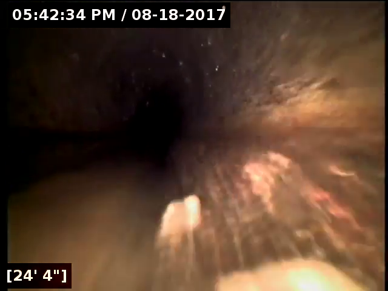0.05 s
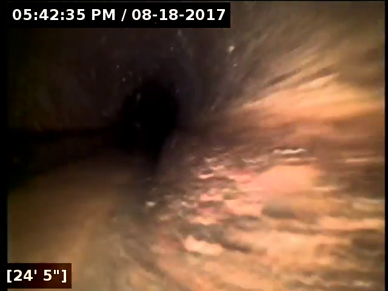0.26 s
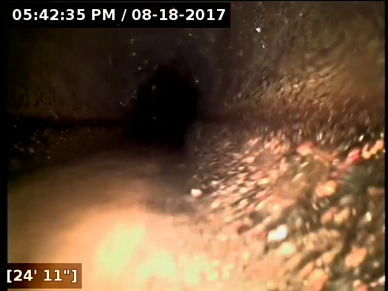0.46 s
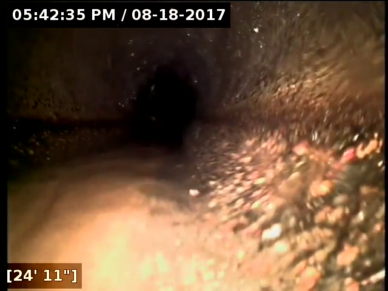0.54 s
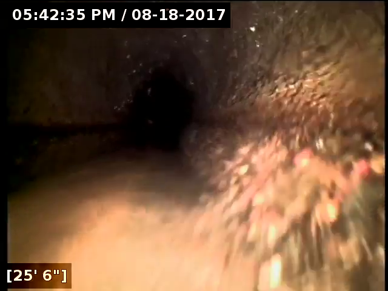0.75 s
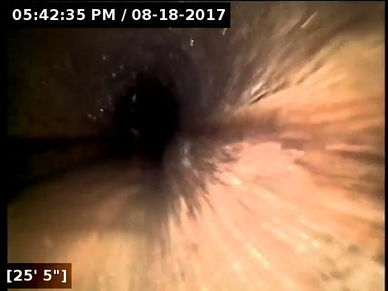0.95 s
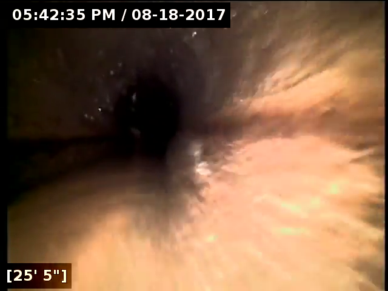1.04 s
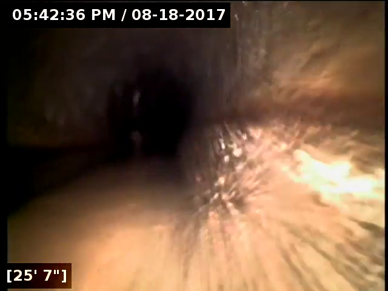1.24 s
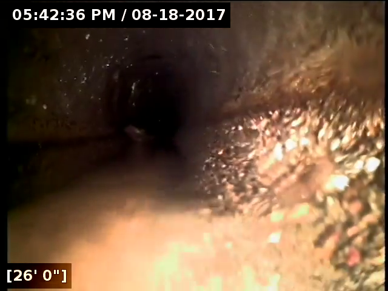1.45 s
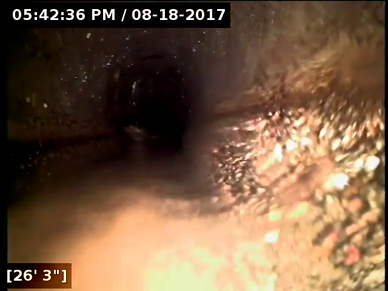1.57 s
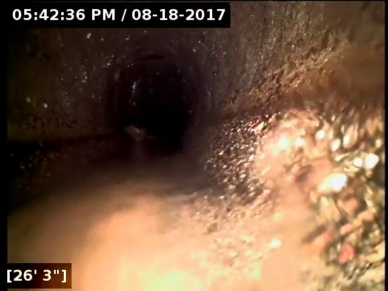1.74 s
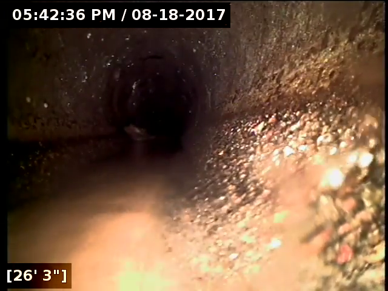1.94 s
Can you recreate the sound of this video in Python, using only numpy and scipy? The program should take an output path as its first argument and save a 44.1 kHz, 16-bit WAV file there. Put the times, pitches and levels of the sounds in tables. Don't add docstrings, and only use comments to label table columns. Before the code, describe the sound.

A stiff cable is pushed by hand into a drain pipe, scraping unevenly, clicking on its reel frame and bumping a hollow drum; a brief dropout, then sparser rattles fade into quiet room air, on a dull small microphone.

```python
import sys
import numpy as np
from scipy import signal
from scipy.io import wavfile
from scipy.ndimage import uniform_filter1d

SR = 44100
rng = np.random.default_rng(int(sys.argv[2]) if len(sys.argv) > 2 else 0)


def boost_factor(decibels):
    exponent = np.asarray(decibels, float) / 20
    return 10 ** exponent


def pcm_store(signal):
    levels = np.round(np.clip(np.atleast_2d(signal), -1, 1) * 32767)
    wavfile.write(sys.argv[1], SR, levels.astype(np.int16).T)


N = 88244

PATCHY_DB = 0.9


def rms_one(x):
    return x / np.sqrt(np.mean(x ** 2) + 1e-20)


def drift(rate_hz):
    pole = np.exp(-80 * np.pi * rate_hz / SR)
    noise = rng.standard_normal(N // 40 + 2002)
    slow = signal.lfilter([1], [1, -2 * pole, pole * pole], noise)[2000:]
    return np.interp(np.arange(N) / 40, np.arange(len(slow)), rms_one(slow))


def ring(x, hz, t60_s):
    pole = boost_factor(-60 / (t60_s * SR))
    w = 2 * np.pi * hz / SR
    return signal.lfilter([0, np.sin(w)], [1, -2 * pole * np.cos(w), pole * pole], x + 1e-18)


def grit(size, contacts_per_s):
    spread_db = 2.2
    when, sign, strength = rng.random((3, size))
    hits = (when < contacts_per_s / SR) * np.sign(sign - 0.5)
    return hits * boost_factor(-spread_db * np.log(strength + 0.0033))


def bandpass(x, low_hz, high_hz):
    return signal.sosfilt(signal.butter(2, [low_hz, high_hz], "band", fs=SR, output="sos"), x)


def coloured(source, spectrum, patchy_db):
    hz, db = np.transpose(spectrum)
    edges_hz = np.geomspace(hz[0], hz[-1], int(3 * np.log2(hz[-1] / hz[0])) + 2)
    out = 0
    together = drift(27)
    for k, (low, high) in enumerate(zip(edges_hz, edges_hz[1:])):
        band = bandpass(source[k % 2], low, high)
        level_db = np.interp(np.log(low * high) / 2, np.log(hz), db)
        out = out + band * boost_factor(level_db + patchy_db * (together / 2 + drift(15)))
    return rms_one(out)


def strike(start_s, peak_db, length_s, rise_s, modes, favoured_hz, spread_db, crack_db):
    contacts_per_s, first_contact, detune = 4000, 7.0, 0.02
    focus_db = 8.0
    highs_sooner = 0.25
    crack_span = 1.674
    t = np.arange(SR // 5) / SR
    decay = t / max(length_s, 5e-4)
    run = (grit(len(t), contacts_per_s) + rng.standard_normal(len(t))) * (1 - np.exp(-t / rise_s))
    run[int(rise_s * SR)] += first_contact

    chance = rng.standard_normal((len(modes), 2))
    sound = 0
    for k, ((hz, level_db, t60_s), (level_dev, pitch_dev)) in enumerate(zip(modes, chance)):
        off_db = focus_db * np.log2(hz / favoured_hz) ** 2
        gain = boost_factor(level_db + spread_db * level_dev - off_db)
        felt = run * np.exp(-decay * (hz / favoured_hz) ** highs_sooner)
        mode = rms_one(ring(felt, hz * (1 + detune * pitch_dev), t60_s))
        sound = sound + gain * (-1) ** k * np.sqrt(t60_s) * mode

    crack = bandpass(run * np.exp(-decay), favoured_hz / crack_span, min(favoured_hz * crack_span, 9000))
    sound = sound + boost_factor(crack_db) * rms_one(crack)

    peak = np.sqrt(2 * uniform_filter1d(sound ** 2, size=200).max())
    out = np.zeros(N + len(t))
    i = int(start_s * SR)
    out[i:i + len(t)] = boost_factor(peak_db) * sound / peak
    return out[:N]


def scrape(drag_db):
    # [f/Hz, density/dB per Hz]
    colour = [(88, -42), (150, -12.5), (247, 2), (431, -17), (588, -7), (1450, -12.5), (2210, -8),
              (3230, -8.5), (3800, -29), (4940, -37.5), (8360, -120)]
    # [f/Hz, level/dB, t60/s]
    mouth_modes = [(571, 6, 0.028), (1288, -0.5, 0.04), (1730, -9, 0.014), (2203, 1, 0.034),
                   (2813, -14, 0.022), (3200, -2, 0.028), (3600, -9, 0.022)]
    flicker_db = 2.5
    ring_db = -1.5
    grains = np.array([grit(N, 5000), grit(N, 5000)])
    body = 0
    for k, (hz, db, t60_s) in enumerate(mouth_modes):
        gain = boost_factor(db + flicker_db * drift(17)) * (-1) ** k
        body = body + gain * ring(grains[k % 2], hz, t60_s)
    return boost_factor(drag_db) * (coloured(grains, colour, PATCHY_DB) + boost_factor(ring_db) * rms_one(body))


def glove(slip_db):
    # [f/Hz, density/dB per Hz]
    colour = [(3600, -21.5), (4200, 12.5), (4800, -1), (6000, 7), (7200, 4), (8300, -1), (9200, -20)]
    return boost_factor(slip_db) * coloured(rng.standard_normal((2, N)), colour, PATCHY_DB)


def knocks():
    # [t/s, peak/dB, favoured f/Hz, clatter/s]
    hits = [(0.0914, -39, 5540, 0.0087), (0.0937, -26, 1140, 0.0048), (.094, -31.5, 2380, 0.0053),
            (0.1, -33.5, 520, 0.008), (0.1971, -41.5, 3100, .004), (0.2362, -28, 1500, 0.0025),
            (0.235, -37.5, 3400, 0.0071), (.445, -36, 1120, 0.0046), (.4475, -34, 3200, 0.0054),
            (0.4501, -46, 5500, 0.0017), (0.5353, -30.5, 2570, 0.0062), (.5372, -23.5, 1850, 0.0078),
            (.539, -24, 830, 0.0038), (.580, -42, 2590, .003), (0.8106, -47.5, 1180, 0.0016),
            (.848, -38.5, 2070, 0.0023), (0.849, -47.5, 5200, .004), (0.85, -35.5, 2900, 0.017),
            (0.861, -35, 600, 0.002), (.874, -36.5, 600, 0.0072), (1.0051, -36, 1500, 0.0023),
            (1.2079, -42, 2170, 0.018), (1.4123, -26.5, 1150, 0.0011), (1.4152, -36, 2800, 0.0052),
            (1.4796, -43.5, 1290, 0.011), (1.6033, -40, 864, 0.0026), (1.648, -42.5, 6300, .008),
            (1.7628, -45, 5530, 0.0062), (1.7908, -49, 1240, 0.0022)]
    # [f/Hz, level/dB, t60/s]
    frame_modes = [(444, 3, 0.1), (541, 5, 0.03), (896, -6, 0.038), (944, -11, 0.042), (1253, -1, 0.043),
                   (1286, 1.5, 0.041), (1500, -13, 0.028), (1722, -8, 0.015), (2316, -2.5, 0.032),
                   (2856, -6.5, 0.052), (3400, -2.5, 0.014), (5030, -2.5, 0.0048), (5350, -6.5, .015),
                   (6300, 4, 0.0087)]
    gain_db, rise_s, spread_db, crack_db = -1, 0.0008, 2.0, -15.5
    return sum(strike(s - 0.0005, db + gain_db, length_s, rise_s, frame_modes, hz, spread_db, crack_db)
               for s, db, hz, length_s in hits)


def bumps():
    # [t/s, peak/dB, favoured f/Hz, rub/s]
    hits = [(0.036, -45, 250, 0.0033), (.101, -28.5, 250, 0.0054), (.112, -40.5, 105, 0.0039),
            (.465, -34, 250, 0.0077), (.503, -33.5, 285, 0.02), (.544, -32.5, 314, 0.018),
            (0.547, -38, 110, 0.01), (0.552, -33.5, 250, 0.0083), (0.669, -40, 280, 0.0093),
            (0.688, -47, 250, .005), (0.727, -42.5, 320, 0.0055), (0.779, -33.5, 250, 0.015),
            (.808, -35.5, 320, 0.036), (0.844, -43, 310, 0.0046), (1.006, -33.5, 250, .008),
            (1.021, -36, 250, .006), (1.082, -56.5, 500, .01), (1.171, -43.5, 500, 0.019),
            (1.413, -31.5, 250, 0.0069), (1.443, -45.5, 250, 0.0079), (1.472, -40, 250, 0.0039),
            (1.593, -41.5, 284, 0.0097), (1.627, -40, 250, 0.013), (1.691, -46, 220, 0.01),
            (1.749, -48.5, 200, 0.0066), (1.803, -44, 300, 0.017), (1.938, -55.5, 150, 0.0068)]
    # [f/Hz, level/dB, t60/s]
    drum_modes = [(105, -36, 0.15), (150, -25, 0.027), (250, -7, 0.12), (320, -5, 0.055), (490, -8, 0.046),
                  (570, 0, 0.025)]
    rise_s, spread_db, crack_db = 0.0029, 2.0, -80.5
    return sum(strike(s - 0.003, db, length_s, rise_s, drum_modes, hz, spread_db, crack_db)
               for s, db, hz, length_s in hits)


def room_air():
    # [f/Hz, density/dB per Hz]
    colour = [(12, -69.5), (20, -14), (80, -12), (151, -1), (229, -12), (527, -22.5), (563, -10),
              (1800, -18), (3800, -66), (4940, -98), (8360, -120)]
    return boost_factor(-54.5) * coloured(rng.standard_normal((2, N)), colour, 2 * PATCHY_DB)


def scene():
    # [t/s, pipe drag/dB, glove slip/dB]
    feed = [(0, -48.5, -55.5), (.12, -50, -61.5), (0.298, -56.5, -64.5), (0.449, -47, -57.5),
            (0.552, -51, -58), (.59, -57.5, -50.5), (0.629, -63, -59), (.78, -65, -67.5), (0.869, -50, -63),
            (0.999, -47, -58), (1.22, -50, -61.5), (1.281, -58, -67.5), (1.45, -54.5, -60.5),
            (1.509, -55, -48), (1.622, -52, -54), (1.691, -66, -62.5), (1.85, -64, -65.5),
            (2.0, -71.5, -69)]
    s, drag_db, slip_db = np.transpose(feed)
    t = np.arange(N) / SR
    rubs = scrape(np.interp(t, s, drag_db)) + glove(np.interp(t, s, slip_db))
    return (rubs + knocks() + bumps() + room_air())[None]


def roll_off(x):
    return signal.sosfilt(signal.butter(12, 8890, fs=SR, output="sos"), x)


def record(dry):
    dip_hz, dip_depth = 4010, 0.72
    x = dry
    for width_hz in (900, 250):
        x = x - dip_depth * signal.lfilter(*signal.iirpeak(dip_hz, dip_hz / width_hz, fs=SR), x)
    x = signal.sosfilt(signal.butter(4, 6850, fs=SR, output="sos"), x)
    t = np.arange(N) / SR
    x = x * ((t < 0.3217) | (t > 0.4270))
    x = signal.sosfilt(signal.cheby2(12, 60, 9580, fs=SR, output="sos"), x)
    return roll_off(x)


dry = scene()
out = record(dry)
pcm_store(out)
```